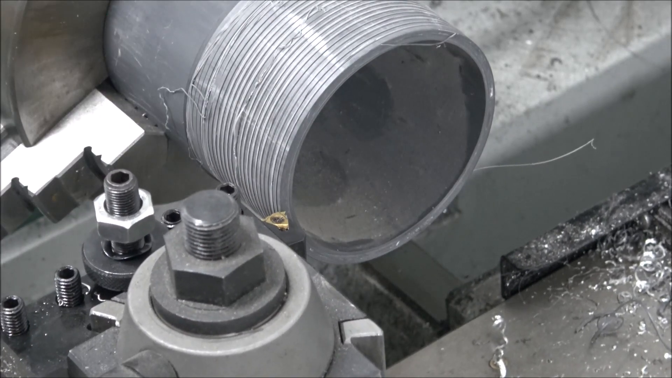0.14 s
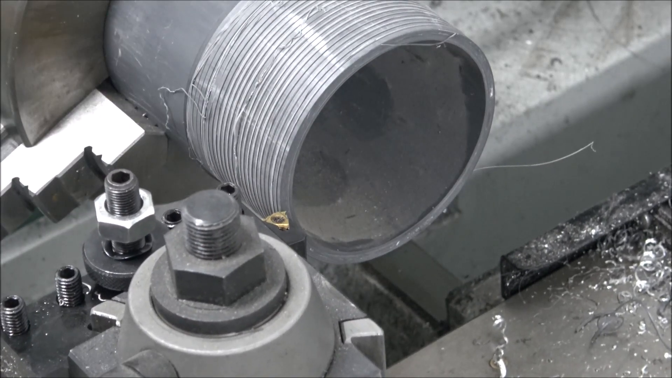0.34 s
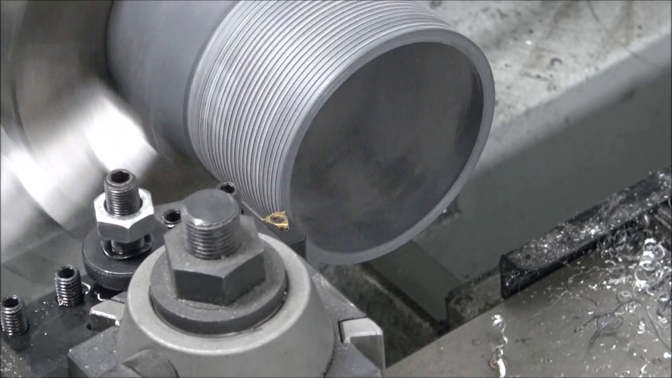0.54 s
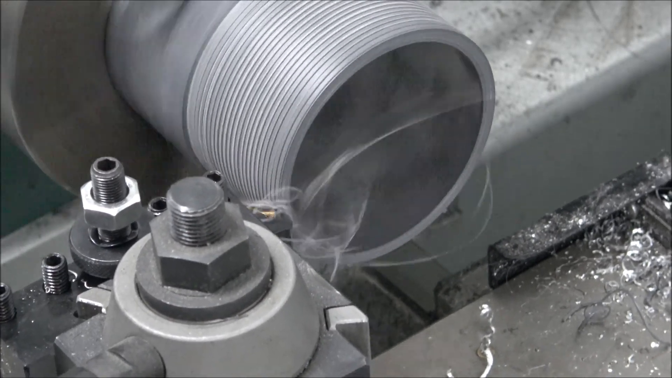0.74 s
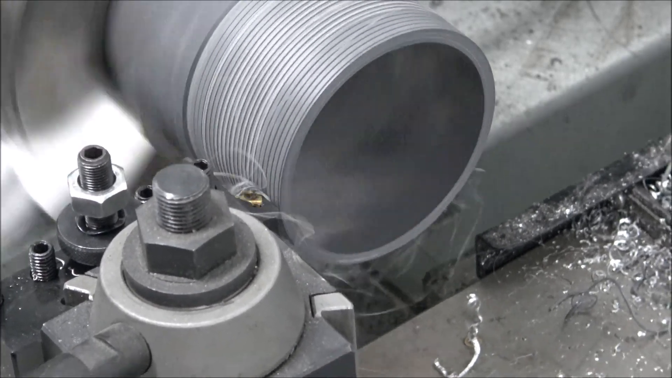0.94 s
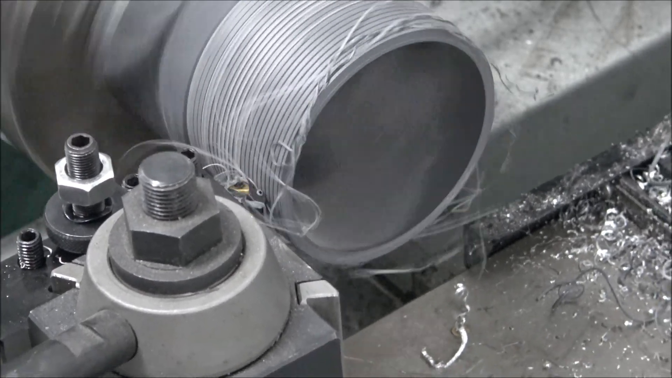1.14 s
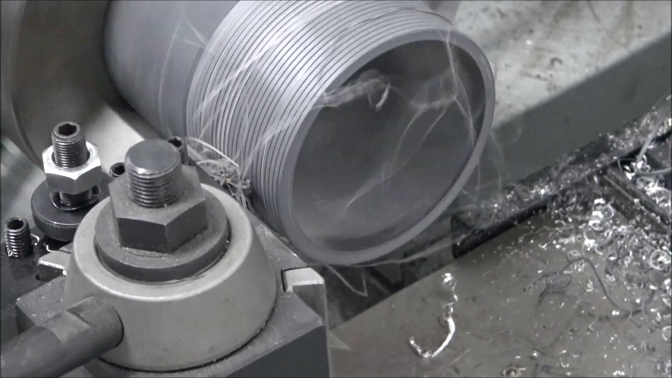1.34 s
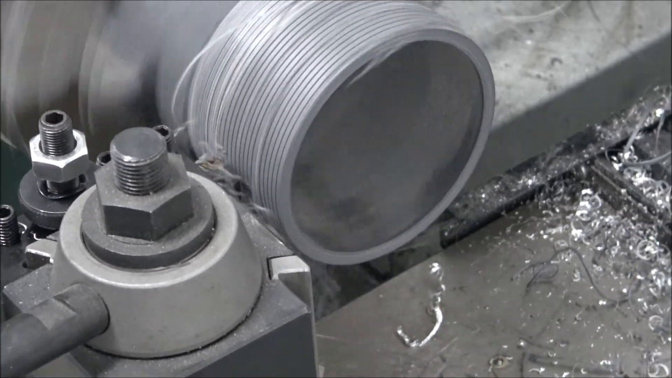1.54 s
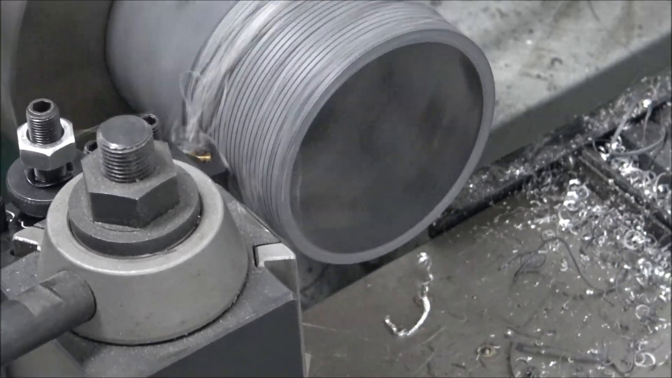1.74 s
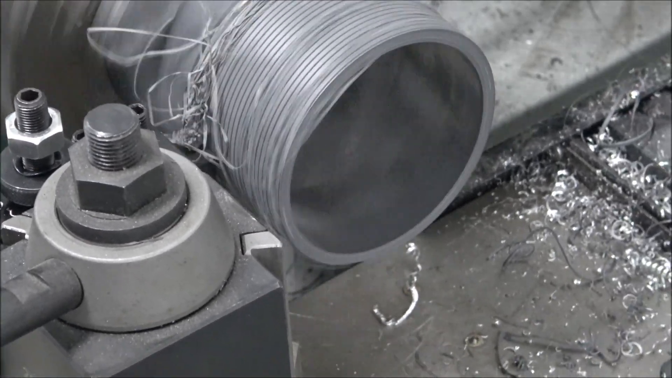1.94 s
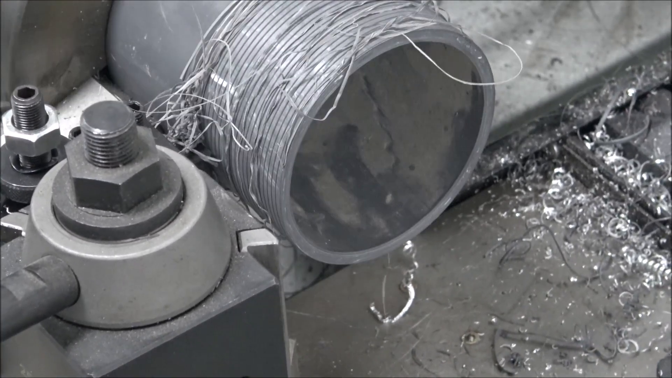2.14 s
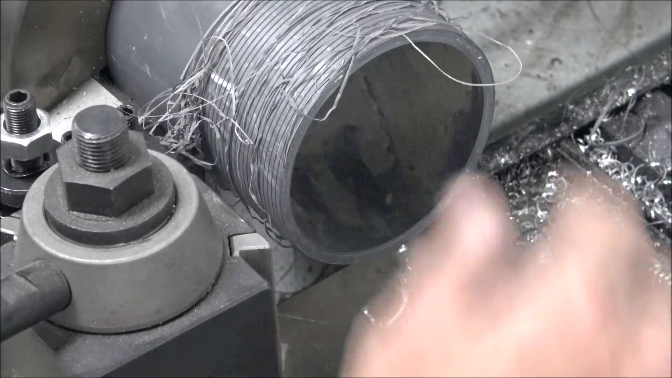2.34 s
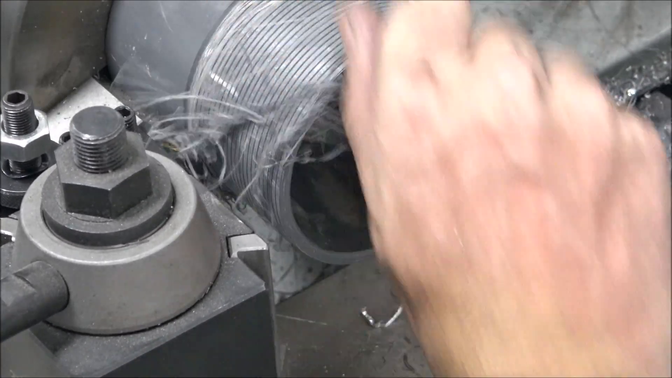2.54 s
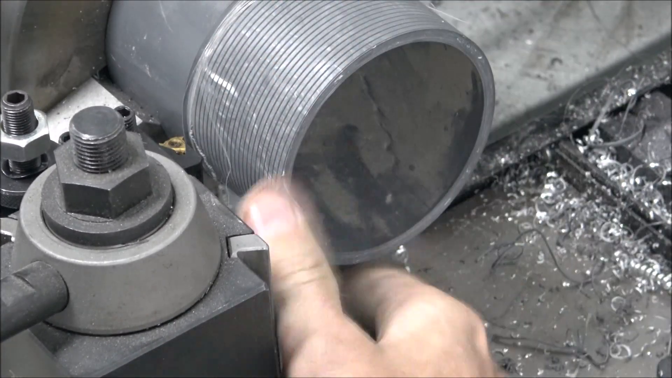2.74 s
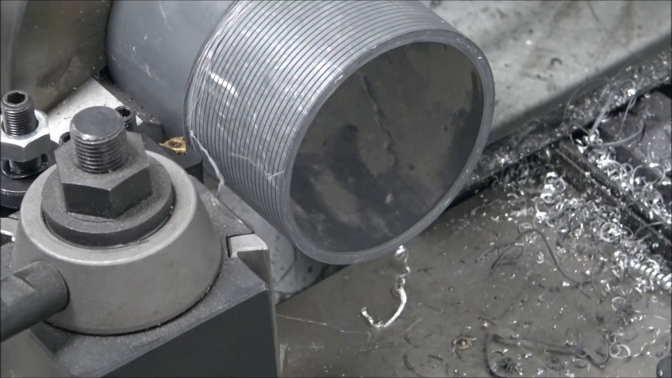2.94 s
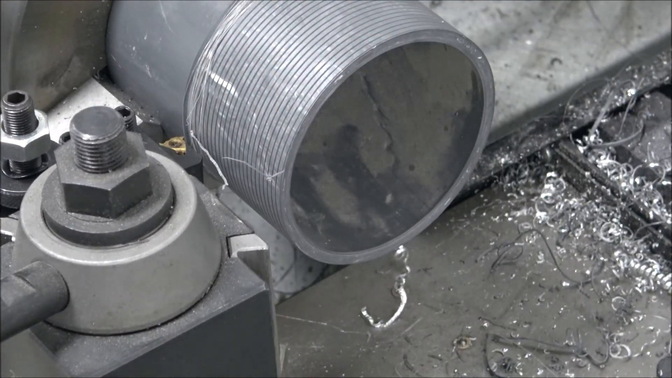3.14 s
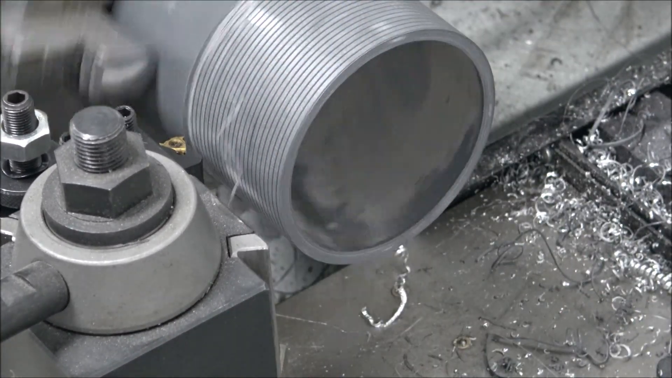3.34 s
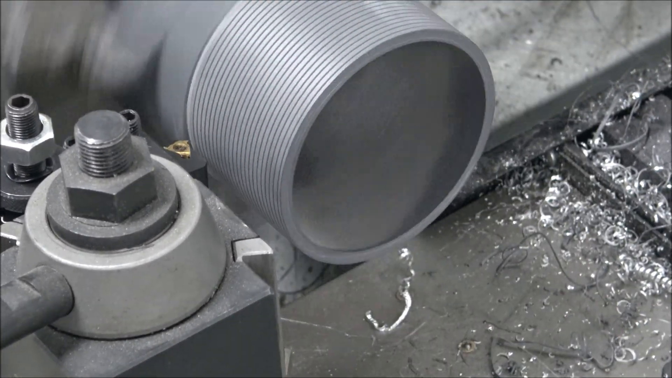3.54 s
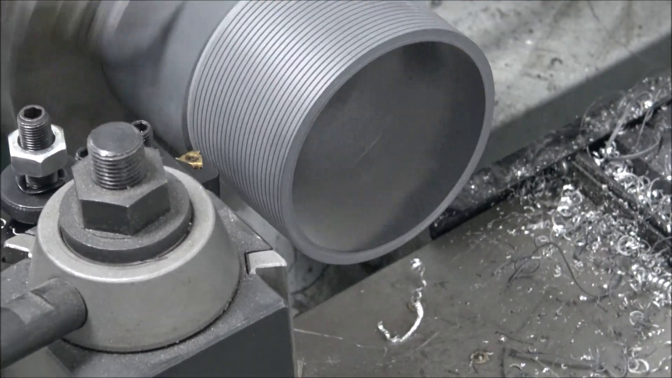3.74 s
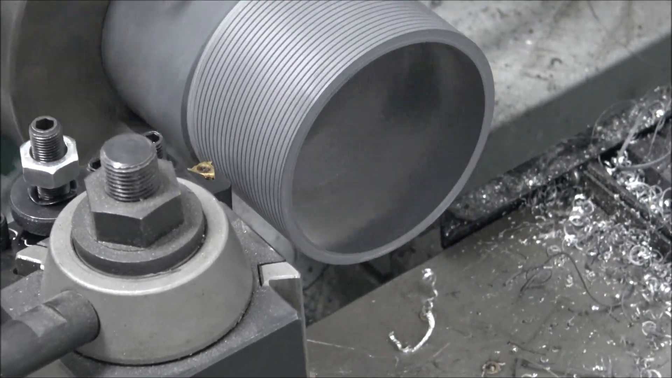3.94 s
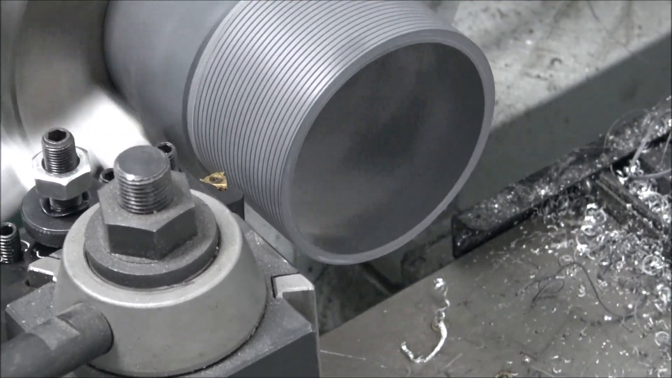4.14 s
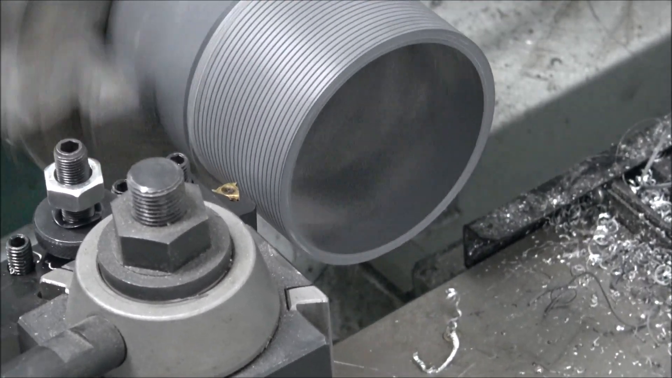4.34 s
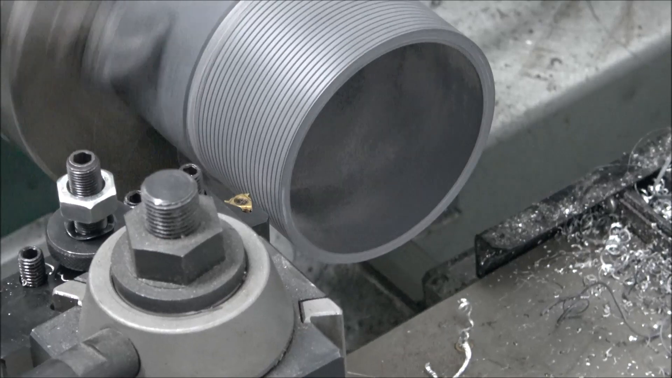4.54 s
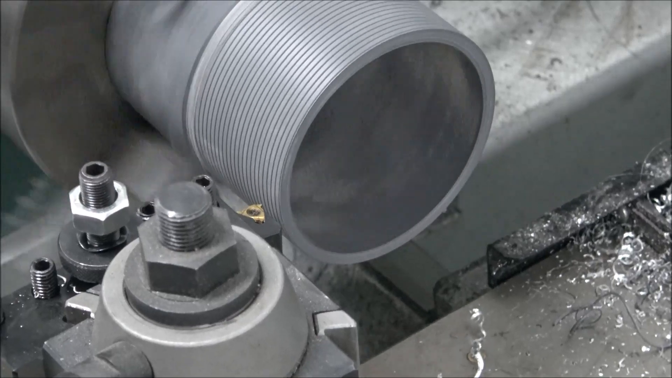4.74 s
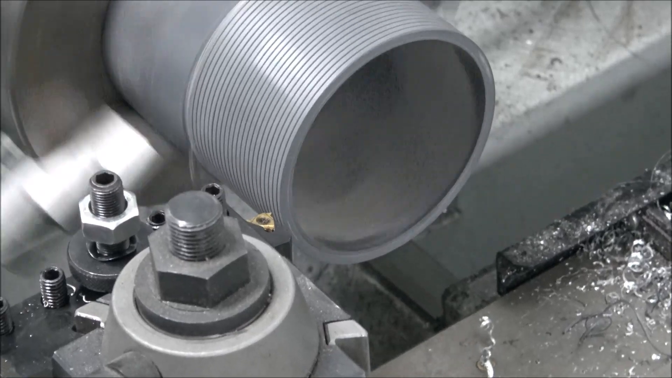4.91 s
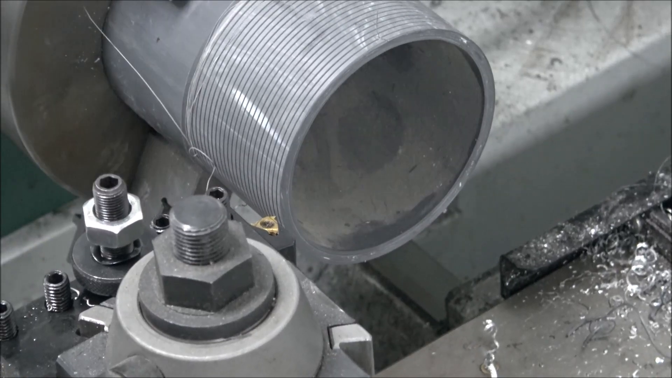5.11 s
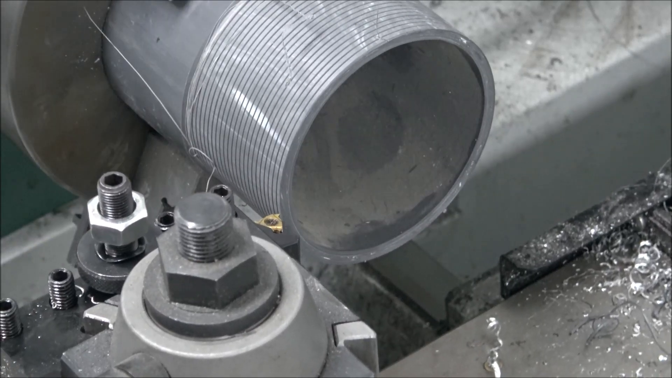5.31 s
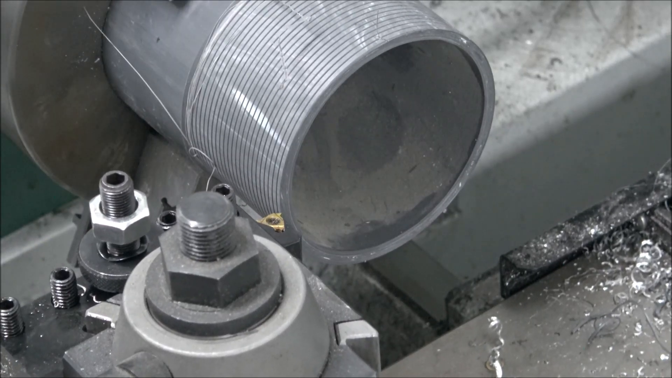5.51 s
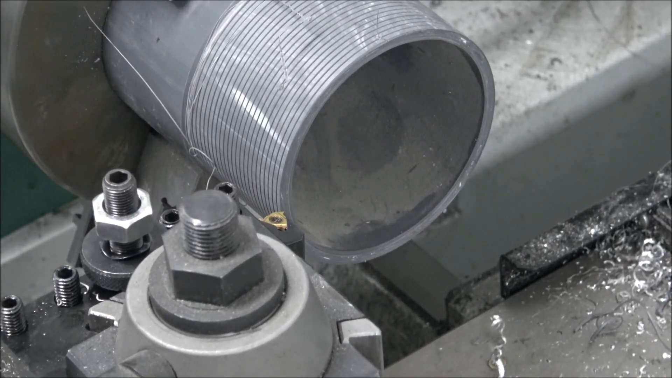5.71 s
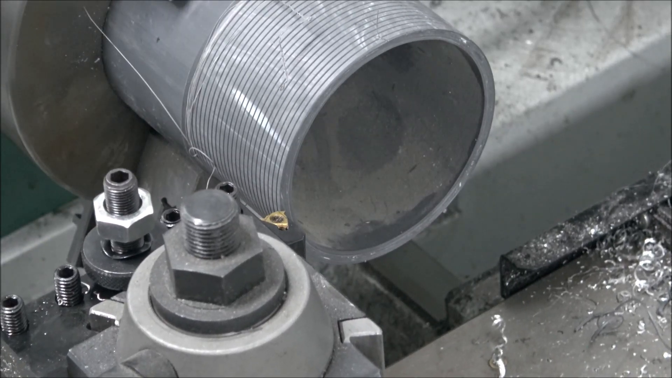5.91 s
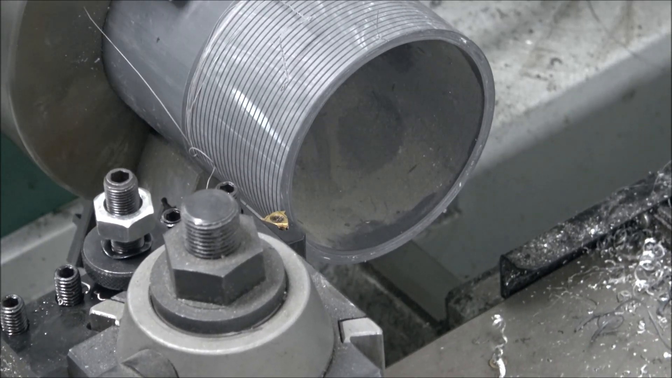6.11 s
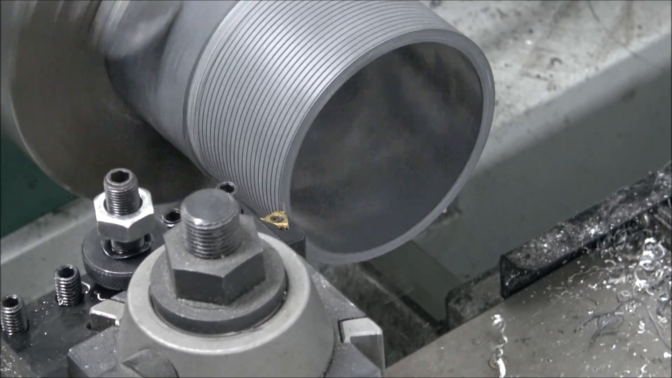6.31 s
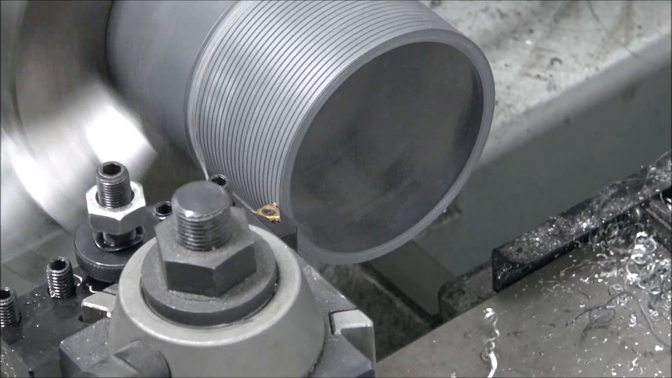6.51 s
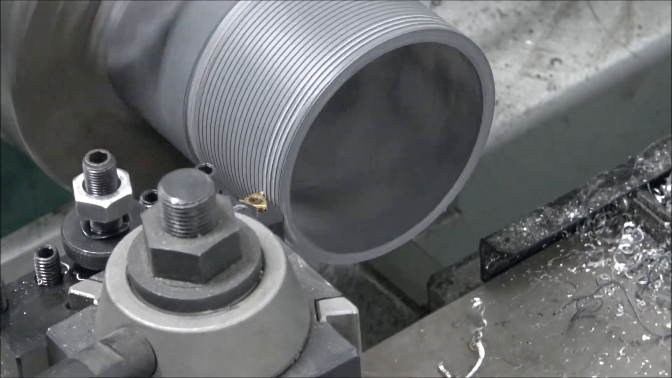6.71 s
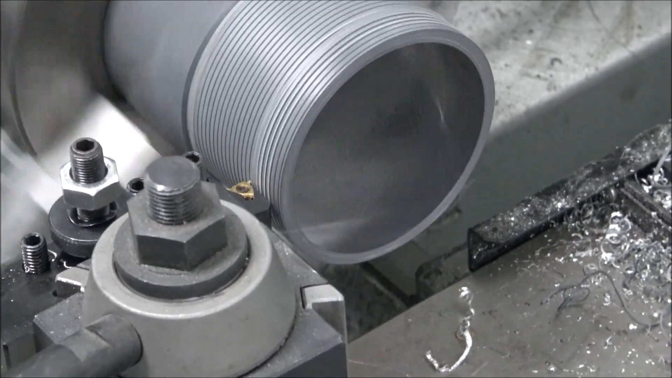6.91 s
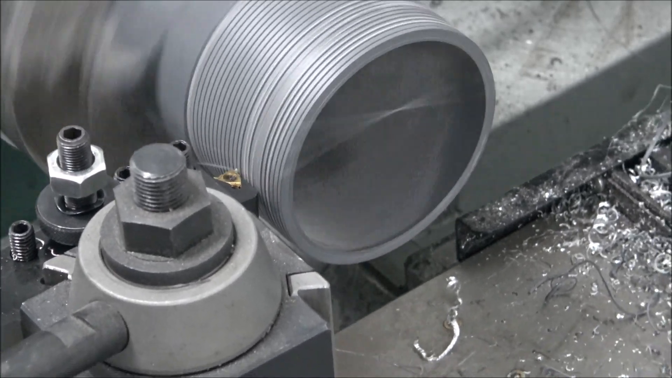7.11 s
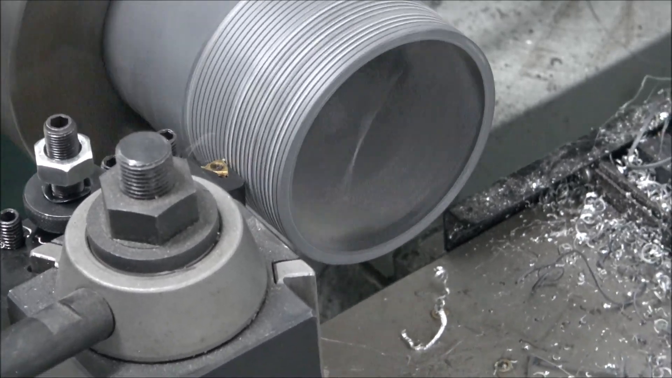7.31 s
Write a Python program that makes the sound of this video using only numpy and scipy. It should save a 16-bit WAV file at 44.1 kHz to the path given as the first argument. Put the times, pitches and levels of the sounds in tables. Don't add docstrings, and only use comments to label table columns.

```python
import sys
import numpy as np
from scipy import signal
from scipy.fft import rfft, irfft
from scipy.io import wavfile
from scipy.ndimage import uniform_filter1d

SR = 44100
rng = np.random.default_rng(int(sys.argv[2]) if len(sys.argv) > 2 else 0)


def convert_level_to_amplitude(level_db):
    exponent = np.asarray(level_db, float) / 20
    return 10 ** exponent


def dump_mix(stems):
    frames = np.atleast_2d(stems).T
    limited = np.clip(frames, -1, 1)
    pcm = np.round(limited * 32767).astype(np.int16)
    wavfile.write(sys.argv[1], SR, pcm)


N = 328986
TIME = np.arange(N) / SR
BINS_HZ = np.maximum(np.fft.rfftfreq(N, 1 / SR), 1)
KNEE_S = 0.2

# (centre [Hz], width [Hz], height over the broad colour [dB])
HEADSTOCK = [(249, 28, 18), (407, 7.4, 13), (566, 20, 13.5), (820, 34, 19), (1040, 40, 7.5),
             (1254, 43, 14.5), (1655, 140, 6.5), (1894, 20, 17), (2180, 144, 11), (2500, 46, 2.5),
             (2668, 123, 9.5), (2940, 75, 0.5), (3570, 81, 6.5), (3844, 28, 10), (4600, 220, 4),
             (5480, 420, 4)]
# (switched on [s], switched off [s], halted by the brake [s])
FORWARD_ON_OFF = [
    (.4, 1.92, 2.045),
    (6.249, 7.6, 7.8),
]
# (switched on [s], switched off [s], halted by the brake [s])
REVERSE_ON_OFF = [
    (3.327, 4.872, 5.09),
]


def rms_one(x):
    return x / np.sqrt(np.mean(x ** 2) + 1e-20)


def at_hz(points, hz):
    points = np.array(points)
    return np.interp(np.log(hz), np.log(points[:, 0]), points[:, 1])


def resonance_gain(modes, hz):
    power = 1
    for centre, width, db in modes:
        power = power + (convert_level_to_amplitude(db) ** 2 - 1) / (1 + (2 * (hz - centre) / width) ** 2)
    return np.sqrt(np.maximum(power, 0.05))


def drift(rate):
    r = np.exp(-80 * np.pi * rate / SR)
    noise = rng.standard_normal(N // 40 + 2002)
    slow = signal.lfilter([1], [1, -2 * r, r * r], noise)[2000:]
    return np.interp(np.arange(N) / 40, np.arange(len(slow)), rms_one(slow))


def coloured(x, colour, modes, low_hz, high_hz):
    edges = 1 / np.sqrt((1 + (low_hz / BINS_HZ) ** 6) * (1 + (BINS_HZ / high_hz) ** 6))
    gain = convert_level_to_amplitude(at_hz(colour, BINS_HZ)) * resonance_gain(modes, BINS_HZ) * edges
    return rms_one(irfft(rfft(x) * gain, N))


def rough_tone(hz, rough, rate):
    turn = np.exp(2j * np.pi * (np.cumsum(hz * np.ones(N)) / SR + rng.random()))
    waver = 1 + rough * (drift(rate) + 1j * drift(rate))
    return np.real(turn * waver) * np.sqrt(2 / (1 + 2 * rough ** 2))


def echoes(t60):
    cluster = rng.standard_normal(N) * convert_level_to_amplitude(-60 * TIME / t60)
    return rfft(cluster / np.sqrt(np.sum(cluster ** 2)))


def spindle(on_off):
    # (share still missing at the knee, time constant [s])
    creeps = [
        (.033, .045),
        (.013, .3),
    ]
    # (time since switch-off [s], share of speed left)
    run_down = [(0, 1), (.035, .84), (.06, .77), (.11, .6), (.17, .3)]
    start_share, full_share, pull_bend = 0.1, 1.001, 1.2
    speed, since, coasting = np.zeros((3, N))
    knee_share = full_share - sum(missing for missing, tau in creeps)
    for on, off, halt in on_off:
        age = np.maximum(TIME - on, 0)
        pull = start_share + (knee_share - start_share) * (age / KNEE_S) ** pull_bend
        creep = full_share - sum(missing * np.exp(-(age - KNEE_S) / tau) for missing, tau in creeps)
        slowing = np.interp(TIME - off, *np.transpose(run_down))
        share = np.where(age < KNEE_S, pull, creep) * slowing
        turning = (TIME >= on) & (TIME < halt)
        speed[turning] = share[turning]
        since[turning] = age[turning]
        coasting[turning] = np.maximum(TIME - off, 0)[turning]
    return speed, since, coasting


def engaged(since):
    play_s, halt_s = 0.031, 0.025
    return uniform_filter1d(1.0 * (since > play_s), size=max(int(halt_s * SR), 1))


def whine(on_off, full_db, surge_db, mesh, pull, mirror):
    # (centre [Hz], width [Hz], height [dB])
    tooth_rings = [(1625, 90, 6), (2885, 70, 7), (8322, 24, 8), (9640, 120, 2)]
    load_follows, coast_db_per_s = 1.26, 130
    surge_s, carrier_hz = 0.052, 16000
    speed, since, coasting = spindle(on_off)
    load_db = full_db + load_follows * 20 * np.log10(speed + 1e-3) - coast_db_per_s * coasting
    load_db = load_db + surge_db * np.exp(-((since - KNEE_S - 0.03) / surge_s) ** 2)
    grid_hz = np.arange(0, SR / 2, 4)
    body = resonance_gain(HEADSTOCK + tooth_rings, grid_hz)

    changing = np.clip((0.992 - speed) / 0.03, 0, 1) * np.clip((speed - 0.5) / 0.12, 0, 1)
    changing *= np.where(np.gradient(speed) < 0, 0.55, 1)
    slack = convert_level_to_amplitude(-11 * np.clip((0.97 - speed) / 0.07, 0, 1))
    steady = slack * engaged(since) * convert_level_to_amplitude(load_db)
    out = 0
    for lines, contact, rough, rate in [(mesh, steady, 0.2, 28), (pull, changing, 0.6, 70)]:
        for hz, db in lines:
            swell = np.interp(hz * speed, grid_hz, body) / np.interp(hz, grid_hz, body)
            roughness = rough * max(1, hz / 2600) ** 1.5
            out = out + convert_level_to_amplitude(db) * contact * swell * rough_tone(hz * speed, roughness, rate)

    settled = np.clip((speed - 0.96) / 0.035, 0, 1)
    for hz, db in mirror:
        mirrored_hz = carrier_hz - (carrier_hz - hz) * speed
        out = out + convert_level_to_amplitude(db + load_db) * settled * rough_tone(mirrored_hz, rough=0.25, rate=5)
    return out


def roar():
    # (frequency [Hz], level [dB per Hz])
    roar_colour = [(15, -68), (25, -26), (184, -37), (324, -18), (472, -20.5), (570, -14.5), (727, -20.5),
                   (1180, -4.5), (1430, -12), (2580, -4.5), (3290, -5), (4670, -4.5), (15700, -15)]
    # (level at full speed [dB], rise [dB per dB of speed], the same coasting)
    forward_roar = [
        (-31.5, 0.6, 0.9),
        (-17.5, 0.5, 1.4),
        (-19.5, 1.46, 2.1),
    ]
    reverse_roar = [
        (-35.5, 0.14, -1),
        (-17.5, 0.64, 0.43),
        (-21, 1, 0.52),
    ]
    sizes = convert_level_to_amplitude(1.7 * np.minimum(rng.exponential(1, N), 5))
    hit = rng.random(N) < 6000 / SR
    contacts = rng.standard_normal(N) * np.where(hit, sizes, 0.8)
    contacts = irfft(rfft(contacts) * (1 + 0.55 * echoes(0.15)), N)
    gains = np.zeros((3, N))
    for on_off, laws in [(FORWARD_ON_OFF, forward_roar), (REVERSE_ON_OFF, reverse_roar)]:
        speed, since, coasting = spindle(on_off)
        speed_db = uniform_filter1d(20 * np.log10(np.where(speed > 0, speed, 0.5)), size=200)
        touch = engaged(since)
        for gain, (db, rising, falling) in zip(gains, laws):
            gain += touch * convert_level_to_amplitude(db + np.where(coasting > 0, falling, rising) * speed_db)
    flutter, out = drift(28), 0
    bands = [(10, 900), (900, 3500), (3500, 20000)]
    for level, (low, high), share_db in zip(gains, bands, [-1.1, -3.5, -0.6]):
        gain = level * convert_level_to_amplitude(share_db + 0.65 * flutter + 0.5 * drift(22))
        out = out + gain * coloured(contacts, roar_colour, HEADSTOCK, low, high)
    return out


def knock(on_off, rings):
    speed, since, coasting = spindle(on_off)
    slowing = coasting > 0
    loose = engaged(since) * np.clip((np.where(slowing, 0.86, 0.97) - speed) / 0.24, 0, 1)
    out = 0
    for hz, start_db, stop_db in rings:
        level = convert_level_to_amplitude(np.where(slowing, stop_db, start_db))
        out = out + loose * level * rough_tone(hz, rough=2.8, rate=46)
    return out


def drive():
    # (pitch [Hz], level [dB rms], roughness, time to die 60 dB [s])
    drive_song = [
        (8000, -31, .31, 0.28),
        (15650, -28, 1.5, 0.83),
    ]
    delay_s = 0.019
    since = spindle(FORWARD_ON_OFF)[1] + spindle(REVERSE_ON_OFF)[1]
    rise = np.clip(since / delay_s, 0, 1) ** 2
    out = 0
    for hz, db, rough, t60 in drive_song:
        out = out + rise * convert_level_to_amplitude(db - 60 * since / t60) * rough_tone(hz, rough, rate=120)
    return out


def clacks():
    # (time [s], peak [dB], ring over the bright part [dB], thump over the bright part [dB])
    clack_events = [(0.402, -7.5, -13, -16.5), (0.4394, -19, -18, -11), (1.919, -14, 4, -22),
                    (2.0554, 0.6, -3, -32), (2.57, -14.5, -16, -25), (3.185, -17, 3, -31),
                    (3.2144, -20, 4, -28), (3.338, -10, -13, -22), (3.3557, -3.5, -13, -30),
                    (5.0473, -3, 0, -21), (6.212, -26, -5, -25), (6.2606, -17.5, -4, -12),
                    (6.2866, -11.5, -5, -17)]
    # (frequency [Hz], level [dB per Hz])
    clack_colour = [(59, -51), (100, -23), (1240, -3.5), (3010, -11.5), (5340, -5), (15700, -17.5)]
    t60_s, rattle_s, build_s, crack_s = 0.13, 0.012, 0.0071, 0.0025
    bands = [(2500, 20000), (450, 2500), (120, 450)]
    bright, ring, thump = [coloured(rng.standard_normal(N), clack_colour, HEADSTOCK, *band) for band in bands]
    out = np.zeros(N)
    for s, db, ring_db, thump_db in clack_events:
        age = np.maximum(TIME - s, 0)
        tail = (age > 0) * convert_level_to_amplitude(db - 17.5 - 60 * np.maximum(age - rattle_s, 0) / t60_s)
        late = np.minimum(age / build_s, 1)
        crack = 1 + 1.8 * np.exp(-age / crack_s)
        body = convert_level_to_amplitude(ring_db + 4.5) * ring + convert_level_to_amplitude(thump_db + 11.5) * thump
        out += tail * (bright * crack + late * body)
    return out


def swarf():
    # (start [s], length [s], ticks per second, tick level [dB], rustle level [dB])
    pulls = [
        (.06, 0.37, 110, -48, -38),
        (2.33, 0.55, 180, -47, -39.5),
        (2.9, .3, 60, -48, -40),
        (3.168, .09, 250, -40, -32.5),
    ]
    # (frequency [Hz], level [dB per Hz])
    rustle_colour = [(4000, -10), (9000, 16), (16000, -8)]
    start, length, per_s, tick_db, rustle_db = np.transpose(pulls)[:, :, None]
    pull = np.sin(np.pi * np.clip((TIME - start) / length, 0, 1)) ** 2
    hit = rng.random(N) < np.sum(per_s * pull, axis=0) / SR
    ticks = hit * convert_level_to_amplitude(3 * np.minimum(rng.exponential(1, N), 3)) + 1e-18
    curl, ringing = rng.integers(0, 10, N), 0
    for k, hz in enumerate(np.geomspace(3600, 10500, 10)):
        r = convert_level_to_amplitude(-60 * hz / (90 * SR))
        w = 2 * np.pi * hz / SR
        ringing = ringing + signal.lfilter([0, np.sin(w)], [1, -2 * r * np.cos(w), r * r], ticks * (curl == k))
    rustle = coloured(rng.standard_normal(N), rustle_colour, [], 4500, 22000) * convert_level_to_amplitude(1.2 * drift(25))
    tick_gain = np.sum(convert_level_to_amplitude(tick_db + 10) * np.sqrt(pull), axis=0)
    rustle_gain = np.sum(convert_level_to_amplitude(rustle_db) * pull, axis=0)
    return tick_gain * ringing + rustle_gain * rustle


def squeaks():
    # (start [s], length [s], pitch [Hz], level [dB rms])
    rubs = [
        (0.11, .07, 3900, -35),
        (2.43, .07, 3750, -40.5),
        (3.203, .05, 3750, -37),
    ]
    out = 0
    for s, length, hz, db in rubs:
        swell = np.sin(np.pi * np.clip((TIME - s) / length, 0, 1))
        out = out + convert_level_to_amplitude(db) * swell * rough_tone(hz, rough=0.8, rate=40)
    return out


def idle():
    # (frequency [Hz], level [dB per Hz])
    fan_colour = [(15, -85), (25, -48), (137, -17.5), (254, -25), (324, -8), (424, -16), (652, -12.5),
                  (707, -14.5), (1180, -4.5), (1590, -10.5), (2580, -10), (3470, -15), (15700, -25.5)]
    # (centre [Hz], width [Hz], height over the broad colour [dB])
    housing = [(856, 123, 7.5), (1010, 89, 5.5), (1150, 70, -2), (1290, 20, -3), (1457, 25, 2.5),
               (1717, 33, 9.5), (1970, 97, 6.5), (2213, 110, 8.5), (2510, 28, 4), (2690, 30, 8),
               (3070, 22, 7), (3850, 80, 4.5), (6050, 32, 0)]
    # (pitch [Hz], level [dB rms])
    idle_tones = [(1168, -48), (1308, -46), (1728, -50), (1970, -47), (2492, -49), (2670, -49), (2955, -52),
                  (4581, -57), (6105, -53), (7628, -55), (9157, -55)]
    pump_db = [-45.5, -58.5]
    # (start [s], length [s], first tone gains [dB], second tone gains [dB])
    strains = [(0.028, 0.11, -1, 16), (0.173, 0.34, 6, .3), (2.3, .62, 1, 7), (2.916, 0.65, 4.5, 13.5),
               (3.54, 1.7, 2.5, 13), (5.752, 0.4, 0, 9.5), (6.122, 0.24, 12.5, 11.5), (6.37, 1.3, -1, -2)]
    pump_hz, strain_edge_s, fan_db, hiss_db = 327.4, 0.066, -34, -39.5
    strain_db = 0
    for s, length, *gains_db in strains:
        strain_db = strain_db + np.outer(gains_db, (TIME >= s) & (TIME < s + length))
    strain_db = uniform_filter1d(strain_db, size=int(strain_edge_s * SR) + 1)
    first_db, second_db = np.c_[pump_db] + strain_db
    pump = convert_level_to_amplitude(first_db) * rough_tone(pump_hz, rough=0.32, rate=1.6)
    pump = pump + convert_level_to_amplitude(second_db) * rough_tone(2 * pump_hz, rough=0.2, rate=3.8)
    white = rng.standard_normal(N)
    air = coloured(white, fan_colour, housing, 10, 6000) * convert_level_to_amplitude(3.0 + 1.2 * drift(3.9))
    hiss = coloured(white, fan_colour, housing, 6000, 22000)
    tones = sum(convert_level_to_amplitude(db + 34.5) * rough_tone(hz, rough=0.6, rate=9) for hz, db in idle_tones)
    return convert_level_to_amplitude(fan_db) * (air + tones) + convert_level_to_amplitude(hiss_db + 2.6) * hiss + pump


def scene():
    # (pitch [Hz], level [dB rms])
    forward_mesh = [(425.3, -52.5), (574.0, -54.5), (806.1, -43), (851.2, -52.5), (1033.6, -49),
                    (1181.0, -27), (1702.5, -51), (1915.1, -34.5), (2361.9, -28), (2509.3, -40),
                    (2612.9, -26.5), (2868.6, -35), (2972.3, -64), (3090.7, -40), (3542.9, -31.5),
                    (3845.7, -40.5), (4298.6, -57), (4576.5, -40), (4651.2, -34), (4798.5, -37),
                    (5019.9, -51), (5461.4, -57), (7529.9, -65), (8316.5, -38), (9965.8, -63),
                    (10039.2, -57)]
    reverse_mesh = [(409.8, -42), (568.6, -38.5), (797.4, -37), (845.9, -38.5), (921.9, -37),
                    (1137.2, -21.5), (1279.2, -31.5), (1705.8, -38), (1843.8, -29.5), (1895.6, -33),
                    (2048.3, -53), (2132.5, -35), (2516.0, -20.5), (2861.9, -27), (2893.5, -40),
                    (2976.3, -35.5), (3411.7, -36), (4548.9, -59), (4832.9, -48), (6254.0, -38.5),
                    (6822.7, -49), (7248.6, -38.5), (7391.3, -42), (8008.3, -42), (9665.7, -36.5),
                    (9697.3, -37)]
    # (pitch [Hz], level [dB rms])
    forward_pull = [(2612.9, -19), (3090.7, -32.5)]
    reverse_pull = [(1137.2, -30), (2516.0, -21.5), (2976.3, -24)]
    # (pitch [Hz], level [dB rms])
    forward_mirror = [(12192.7, -48), (12670.4, -43), (14105.1, -42), (14805.6, -42), (15049.8, -54),
                      (15284.0, -53), (15402.5, -51), (15522.2, -53)]
    reverse_mirror = [(12334.6, -49), (12794.2, -42), (13489.4, -45), (13715.5, -41), (14175.1, -36),
                      (14850.0, -43), (15196.5, -47), (15310.3, -40), (15540.4, -50), (15656.8, -53)]
    # (pitch [Hz], level starting [dB rms], level coasting [dB rms])
    forward_knock = [(813, -33, -37), (1253, -39, -26), (1904, -40, -28)]
    reverse_knock = [(812, -25, -25), (1250, -30, -26)]
    # (frequency [Hz], left minus right [dB])
    tilt_points = [(60, 0), (200, .3), (380, .6), (700, -.2), (2380, .1), (8120, -.4), (15000, -.2)]
    # (frequency [Hz], side minus centre [dB])
    width_points = [(60, -33), (110, -32), (200, -22), (380, -20), (700, -25), (1290, -20), (2380, -20),
                    (4400, -21), (8120, -22), (15000, -23)]
    forward = whine(FORWARD_ON_OFF, 4, 3.5, forward_mesh, forward_pull, forward_mirror)
    reverse = whine(REVERSE_ON_OFF, 0.3, -3.5, reverse_mesh, reverse_pull, reverse_mirror)
    mid = forward + reverse + roar() + drive() + clacks() + swarf() + squeaks() + idle()
    mid = mid + knock(FORWARD_ON_OFF, forward_knock) + knock(REVERSE_ON_OFF, reverse_knock)
    tilt = np.tanh(at_hz(tilt_points, BINS_HZ) * np.log(10) / 40)
    spread = echoes(0.12) * convert_level_to_amplitude(at_hz(width_points, BINS_HZ) - 0.5)
    side = irfft(rfft(mid) * (tilt + spread), N)
    ahead, back = spindle(FORWARD_ON_OFF)[0], spindle(REVERSE_ON_OFF)[0]
    lean_db = 1 * (1 - ahead - back) + 1.2 * ahead - 0.5 * back
    lean = convert_level_to_amplitude(lean_db / 2)
    return np.array([(mid + side) * lean, (mid - side) / lean])


def coarse_side(pair):
    # (frequency [Hz], level under the centre [dB])
    side_step = [(200, -15), (1500, -12.5), (3500, -11.5), (6000, -9), (12000, -7.5)]
    centre = pair[0] + pair[1]
    mid, side = signal.stft([centre, pair[0] - pair[1]], nperseg=2048)[2]
    step_db = at_hz(side_step, np.linspace(1, SR / 2, len(mid)))
    nearby = np.sqrt(uniform_filter1d(np.abs(mid) ** 2, size=48, axis=0))
    step = convert_level_to_amplitude(step_db)[:, None] * nearby + 1e-12
    stepped = step * np.round(np.abs(side) / step - 0.1) * np.exp(1j * np.angle(side))
    side = signal.istft(stepped, nperseg=2048)[1][:N]
    return (centre + side * [[1], [-1]]) / 2


def top_cut(x):
    return signal.sosfilt(signal.butter(12, 17080, fs=SR, output="sos"), x)


def record(dry):
    duck_at_s, duck_s, duck_db = 0.646, 0.025, -5
    loud_db_per_s, quiet_db_per_s, quiet_from_s = 1.5, 7, 2.25
    fade_s, fade_db = 0.048, -2
    after = TIME - duck_at_s
    regained_db = loud_db_per_s * after + quiet_db_per_s * np.maximum(TIME - quiet_from_s, 0)
    gain_db = np.clip(after / duck_s, 0, 1) * np.minimum(duck_db + regained_db, 0)
    gain_db = gain_db + fade_db * np.clip(1 - (TIME[-1] - TIME) / fade_s, 0, 1)
    rounded = 0.97 * np.tanh(dry * convert_level_to_amplitude(gain_db) / 0.93)
    steep = signal.ellip(12, 0.3, 70, 15730, fs=SR, output="sos")
    mix = signal.sosfilt(steep, coarse_side(rounded))
    return top_cut(mix)


dry = scene()
out = record(dry)
dump_mix(out)
```